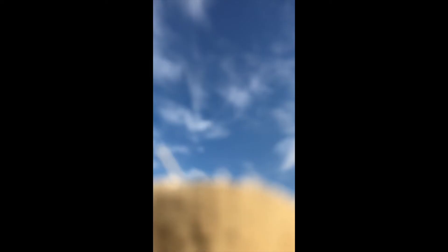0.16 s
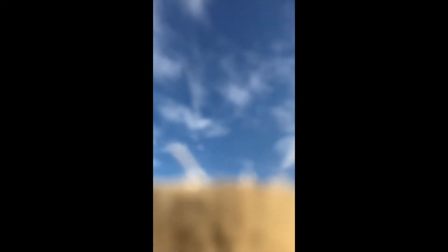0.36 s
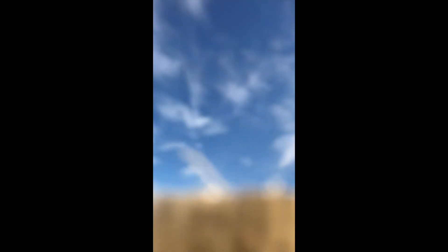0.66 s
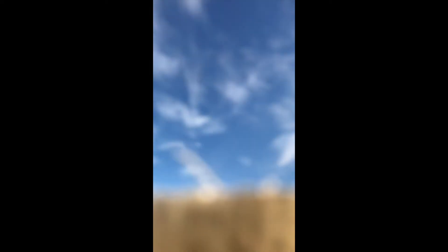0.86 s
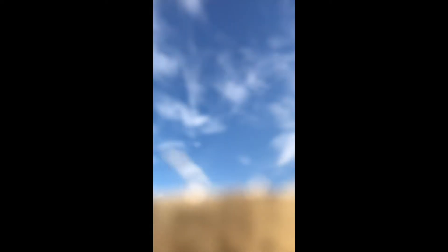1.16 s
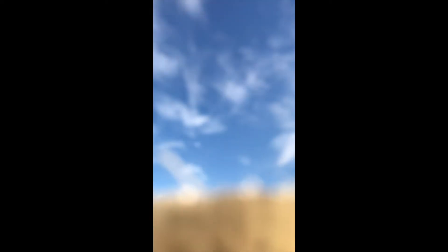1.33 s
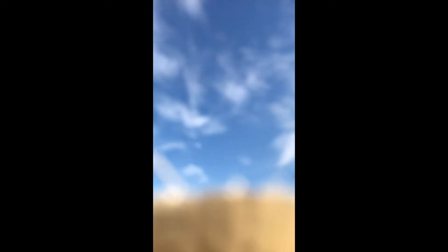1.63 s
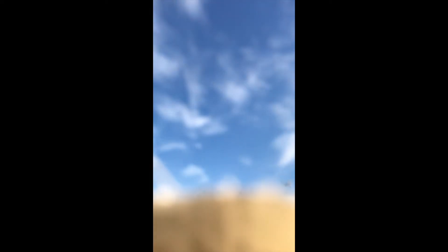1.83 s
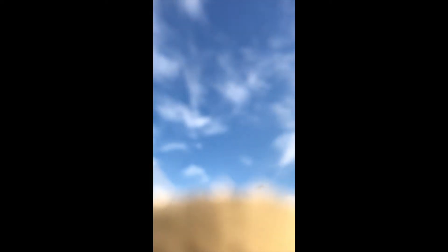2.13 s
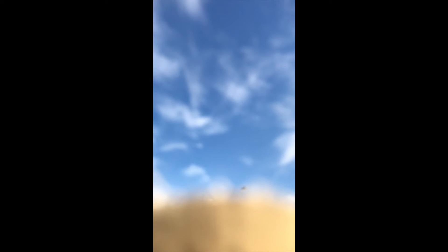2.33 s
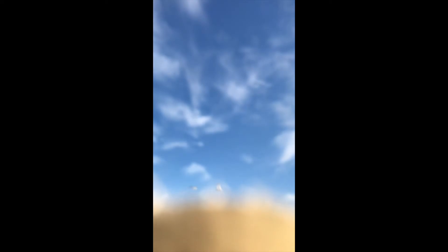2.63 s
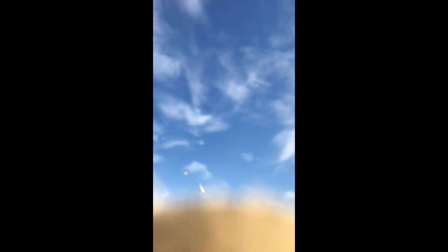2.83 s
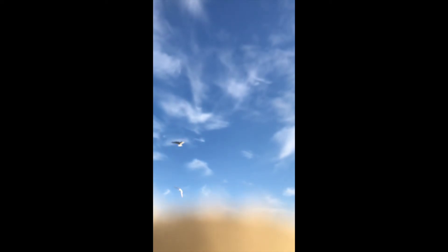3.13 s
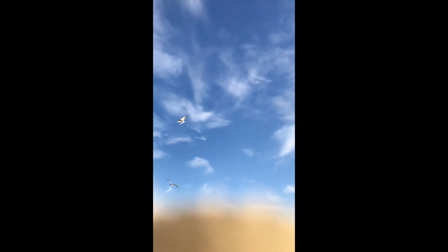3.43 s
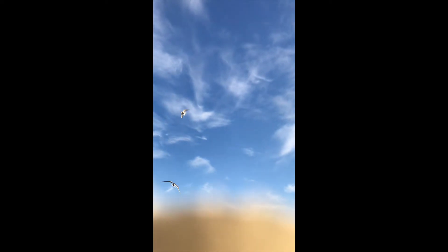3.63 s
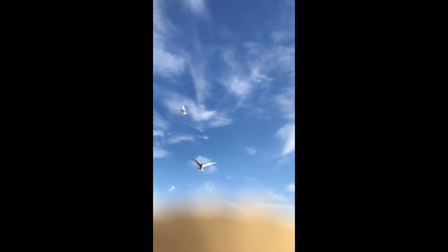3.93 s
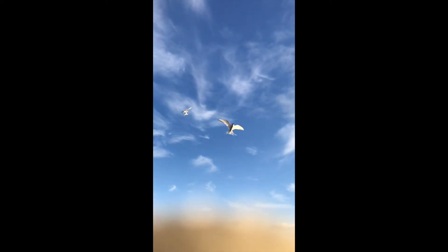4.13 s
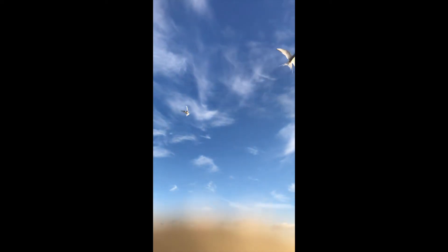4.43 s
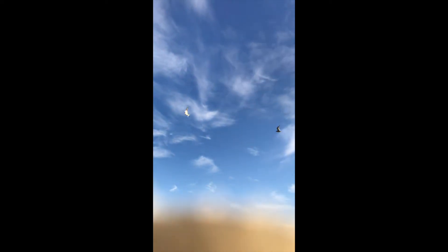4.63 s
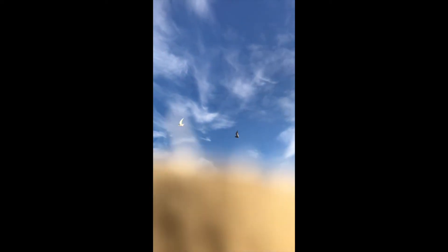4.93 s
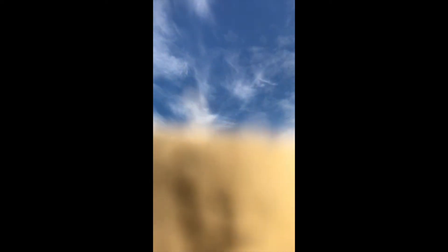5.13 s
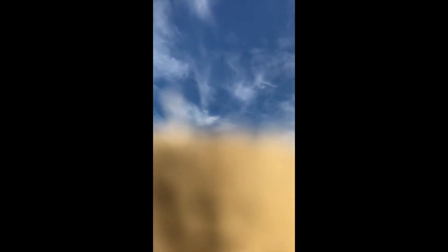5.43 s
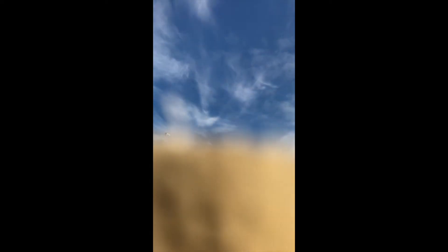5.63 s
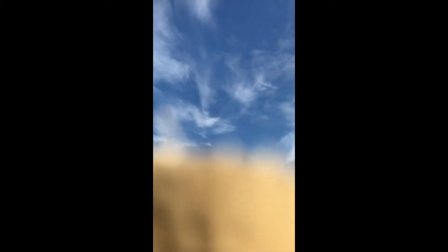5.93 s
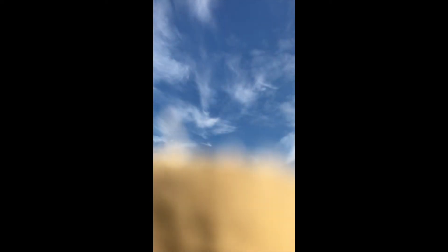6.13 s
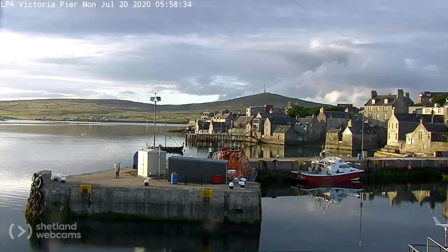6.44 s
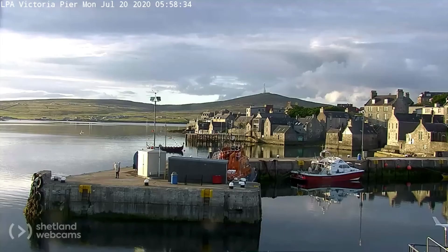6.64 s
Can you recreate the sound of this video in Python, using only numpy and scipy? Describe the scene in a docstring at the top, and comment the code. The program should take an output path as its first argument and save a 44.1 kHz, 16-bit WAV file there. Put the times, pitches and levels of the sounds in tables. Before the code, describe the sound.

Terns call close by in the open air, giving short, sharp, high kip notes that drop into a rasp. One holds a harsh cry while others scream and whistle further off, and a gull calls faintly in the distance. The kips pause briefly, then return louder. The harbour shore gives a slight echo. Underneath, a far engine drones with a low rumble and faint hiss, and light wind now and then bumps the microphone.

```python
"""Terns give sharp 'kip' calls over a harbour shore: a whistle from the two sides of the syrinx snaps on,
falls and breaks into a rasp, slow pulses ringing the throat. One holds a harsh cry; others scream and
whistle further off, and a gull and a low coo sound in the distance. The shore throws back a faint echo
and a thin tail. Underneath, a far engine drones in three low tones, a faint hiss comes and goes,
and light wind now and then bumps the microphone."""
import sys
import numpy as np
from scipy import signal
from scipy.fft import rfft, irfft, next_fast_len
from scipy.io import wavfile
from scipy.ndimage import uniform_filter1d, map_coordinates

SR = 44100
rng = np.random.default_rng(int(sys.argv[2]) if len(sys.argv) > 2 else 0)


def int16_out(signal):
    """Quantize to a 16-bit WAV file."""
    q = np.round(np.clip(np.atleast_2d(signal).T, -1, 1) * 32767)
    wavfile.write(sys.argv[1], SR, q.astype(np.int16))


N = 298998
TIME = np.arange(N) / SR

# The near kips. Each row: start in seconds, top pitch in Hz, whistle length in seconds, level in dB,
# swell of the fundamental over the fall in dB, brightness in dB per overtone, rasp level in dB.
KIPS = [(0.28, 3782, 0.041, -36.5, 5.5, 3.5, -36), (0.653, 3850, 0.047, -31.5, 0, 2, -32),
        (1.541, 3800, 0.046, -31, -5, -2.5, -36.5), (1.905, 3682, 0.052, -32.5, -5, -4.7, -42.5),
        (2.314, 3633, .053, -33, -9.5, -5, -44), (2.652, 3587, 0.049, -39.5, 3.5, -2, -36),
        (2.677, 3570, .044, -33.5, -8, -2, -39.5), (2.982, 3720, 0.036, -37.5, 7, -3, -36.5),
        (2.993, 3663, .043, -32.5, 0, 1.5, -36.5), (4.421, 3833, 0.047, -28, -2, 2.1, -31.5),
        (4.745, 3844, .048, -25, -3.5, -.5, -33), (5.018, 3742, .041, -30.5, -5, 2, -32),
        (5.338, 3666, 0.041, -37, 5.5, 2.7, -36), (5.654, 3820, .043, -39.5, 7, 3, -41.5),
        (5.956, 3697, 0.043, -37.5, 4.5, 0, -40.5), (6.284, 3720, 0.043, -39, 3.5, 1.5, -42)]
# Harmonics 2 to 4 of a kip. Each row: level in dB before brightness is added, change over the fall in dB.
KIP_OVERTONES = [(-12, -6.5), (-19.5, -15), (-17.5, -12.5)]
# The resonances of throat and beak that shape the rasp. Each row: frequency in Hz, gain in dB.
THROAT_EQ = [(400, -17.5), (800, -10), (1200, -8), (1700, -9), (2400, -3), (3100, 4.5), (4500, -4),
             (6200, -17.5), (7600, -24.5), (10500, -24.5), (13500, -29), (15500, -32.5)]
# 'Kee-arr' screams. Each row: start, length, rise time and end of the hold in seconds, pitch in Hz,
# level in dB, level change during the fall in dB per second, starting roughness from 0 to 1.
SCREAMS = [(.459, 0.23, .007, 0.13, 2253, -53, 23.5, 0.05), (1.763, 0.036, .002, .06, 2380, -55, 0, 0.25),
           (2.426, .21, .013, 0.14, 2367, -55.5, -110, 0.1),
           (2.47, 0.23, 0.0018, 0.18, 2483, -61.5, -5, 0.16),
           (3.885, .24, .035, .16, 2400, -60.5, -25, 0.51)]
# A near tern holds a high whistle and breaks into a rattle. The row reads like a scream's.
HARSH_CALL = [(1.893, .287, 0.012, .19, 3330, -47.5, 3.5, 0.13)]
# Faint tern whistles, and the steeply falling end of a scream at 4.085 s. Each row: start and length in
# seconds, pitch in Hz, sag as a share of the pitch per second, level in dB, roughness from 0 to 1.
FAINT_NOTES = [(1.811, 0.11, 3400, 0.4, -62.5, 0.2), (2.80, 0.19, 3520, .8, -66, .35),
               (3.34, 0.34, 3550, 0.65, -81, .25), (3.792, 0.099, 3400, 0.48, -66.5, 0.2),
               (4.085, .12, 3050, 4.2, -61.5, .45), (4.19, .15, 3090, 0.72, -71, .45),
               (5.85, 0.35, 3297, 0.43, -65.5, .45)]
# A far gull's notes. The rows read like the faint notes'.
GULL_NOTES = [(.755, 0.095, 992, 0.66, -54, 0.3), (.82, 0.16, 1133, 1.06, -59, 0),
              (2.12, 0.16, 910, 1.4, -57, .75)]
# A faint low coo. The row reads like a scream's.
COO = [(5.28, 0.367, .025, .19, 331, -66.5, -39, 0.032)]
# The tone of each voice. Each entry: a harmonic's gain in dB, from the fundamental up.
SCREAM_HARMONICS_DB = [-3, -0.5, -16.5, -18, -23.5]
HIGH_VOICE_HARMONICS_DB = [1.5, -5.5, -26.5, -16.5]
GULL_HARMONICS_DB = [-0.5, -13]
COO_HARMONICS_DB = [1, -1, -12]
# The far engine's drone. Each row: frequency in Hz, level in dB.
ENGINE_TONES = [(64.6, -66.5), (91.6, -59.5), (115.3, -55)]
# The spectrum of rumble and open air. Each row: frequency in Hz, relative level in dB.
AIR_EQ = [(22, -28.5), (42, -13), (64, 0.5), (80, -0.5), (105, -3), (140, -6.5), (190, -13.5), (330, -15),
          (560, -24.5), (1100, -27.5), (2000, -42), (4000, -43.5), (9000, -59.5), (16000, -50.5)]
# Swells in the faint hiss. Each row: peak time and half width in seconds, level in dB.
HISS_SWELLS = [(0.581, 0.26, -69.5), (4.2, 0.14, -78.5), (4.8, 0.13, -71.5)]
# Wind bumps. Each row: peak time in seconds, centre in Hz, level in dB, half width in seconds.
WIND_BUMPS = [(.678, 300, -60, .006), (4.875, 62, -50, .03), (4.865, 160, -60, .02), (5.10, 185, -60, .015),
              (5.275, 150, -58, .015)]
# The master fader. Each row: time in seconds, gain from 0 to 1.
FADER = [(.187, 0), (.195, 1), (6.385, 1), (6.405, 0)]


def kip(top_hz, length, db, swell_db, bright_db, rasp_db, hold=.221, twin_gain=.53, twin_lag_s=.00489):
    """A whistle snaps on, holds, falls, and breaks into a rasp near a quarter of its final pitch."""
    t = np.arange(SR // 8) / SR
    progress = t / length
    end_hz = top_hz * (1 - 10 * (length - .026))  # longer kips fall further

    def syrinx_side(lag_s):
        """One side of the syrinx; it starts slightly sharp, and its overtones fade as the pitch falls."""
        fall = ease(((t - lag_s) / length - hold) / (1.08 - hold))
        wobble = .02 * np.exp(-t / .003) + .005 * wander(t, 300) + (.003 + .008 * fall) * wander(t, 1500)
        phase = phase_of((top_hz + (end_hz - top_hz) * fall) * (1 + wobble))
        tone = np.sin(phase)
        for k, (base_db, fade_db) in enumerate(KIP_OVERTONES, 2):
            overtone_db = base_db + (k - 1) * bright_db + (fade_db - swell_db) * fall
            tone += undb(overtone_db + 3.5 * wander(t, 220)) * np.sin(k * phase)
        return np.sqrt(2) * undb(db + swell_db * fall + wander(t, 130)) * tone

    # the second side joins late and trails in pitch, so the two beat on the way down
    twin = twin_gain * ease((progress - .28) / .3)
    whistle = syrinx_side(0) + twin * syrinx_side(twin_lag_s * rng.uniform(.93, 1.1))
    whistle /= np.sqrt(1 + twin ** 2)
    # air hisses at the snap and again as the tone frays
    snap = undb(db - 12) * np.exp(-t / .003)
    fray = undb(rasp_db - 14) * ease((progress - .35) / .65)
    breath = noise(len(t), [(1200, -28), (2800, .5), (7000, -6), (10000, -15), (15000, -11.5)])
    whistle += (snap + fray) * breath
    whistle *= ease(t / .002) * (1 - .2 * np.exp(-t / .008)) * ease((length + .004 - t) / .008)
    # the rasp takes over and the beak shuts on it
    after = np.maximum(t - length, 0)
    rasp_envelope = ease((t - length + .002) / .005) * np.exp(-(after / .021) ** 2.4)
    pulse_hz = end_hz * rng.uniform(.265, .295) * np.exp(-7 * after)
    return whistle + undb(rasp_db) * rasp_envelope * rasp(t, pulse_hz, jitter=rng.uniform(.04, .09))


def rasp(t, hz, jitter, harmonics=18):
    """The syrinx drops to slow uneven pulses that ring the throat; the treble is mostly gated hiss."""
    phase = phase_of(hz * (1 + jitter * wander(t, 1600)))
    # each overtone lags and flickers on its own, as the throat smears every pulse
    pulses = unit(sum(np.cos(k * phase + lag) * undb(2.5 * wander(t, 180))
                      for k, lag in enumerate(rng.uniform(0, np.pi, harmonics), 1)))
    hiss = eq(rng.standard_normal(SR)[:len(t)], [(1000, -14), (3500, 0), (9000, 3)])
    gate = 1 + np.cos(phase)
    source = (pulses + .6 * hiss * gate) * undb(2 * wander(t, 500))
    return unit(eq(source, THROAT_EQ))


def tern_kips(echo_s=.195):
    """The near kips, and their single dull echo off the shore as a separate layer."""
    direct, echo = np.zeros(N), np.zeros(N)
    for start, *shape in KIPS:
        call = kip(*shape)
        add(direct, start, call)
        add(echo, start + echo_s, call)
    return direct, eq(echo, [(1000, -24.5), (3700, -40), (7500, -36.5), (12000, -48.5)])


def tern_cries():
    """The terns' longer voices: screams, one harsh near call and faint sinking notes, with some rasp."""
    screams = arched_calls(SCREAMS, scoop=.12, sag_per_s=.22, fall_per_s=6.8, bend_s=.011,
                           hoarsen=.28, break_s=.028, onset_db=-1)
    harsh = arched_calls(HARSH_CALL, scoop=.25, sag_per_s=.12, fall_per_s=.8, bend_s=.0024,
                         hoarsen=.9, break_s=.029, onset_db=-12)
    faint = sagging_calls(FAINT_NOTES, fade_db=-2)
    return (cries(screams, SCREAM_HARMONICS_DB, flutter_db=1.2, waver=.003, rasp_mix=1.3, near_db=-49)
            + cries(harsh + faint, HIGH_VOICE_HARMONICS_DB,
                    flutter_db=.95, waver=.007, rasp_mix=1.3, near_db=-45.5))


def arched_calls(rows, scoop, sag_per_s, fall_per_s, bend_s, hoarsen, break_s, onset_db):
    """Curves for calls that scoop up to pitch, hold, then bend down, gaining `hoarsen` in roughness."""
    calls = []
    for start, length, rise, held, hz, db, fade_db_per_s, rough in rows:
        t = np.arange(int(length * SR)) / SR
        onset = np.exp(-t / rise)
        falling_s = bend_s * np.logaddexp(0, (t - held) / bend_s)  # the hold rounds off into the fall
        pitch = hz * (1 - scoop * onset) * np.exp(-sag_per_s * t - fall_per_s * falling_s)
        level_db = db + onset_db * onset + fade_db_per_s * falling_s
        calls.append((start, t, pitch, level_db, rough + hoarsen * ease(falling_s / break_s)))
    return calls


def sagging_calls(rows, fade_db):
    """Curves for plain notes that sink and fade evenly."""
    calls = []
    for start, length, hz, sag_per_s, db, rough in rows:
        t = np.arange(int(length * SR)) / SR
        calls.append((start, t, hz * np.exp(-sag_per_s * t), db + fade_db * t / length, rough))
    return calls


def cries(calls, harmonics_db, flutter_db, waver, rasp_mix, near_db):
    """A harmonic voice follows each call's curves; roughness shakes its pitch and blends in any rasp."""
    out = np.zeros(N)
    for start, t, hz, db, rough in calls:
        rough = np.clip(rough, 0, 1)
        wobble = waver * wander(t, 200) + .06 * rough * wander(t, 900)
        phase = phase_of(uniform_filter1d(hz, size=500) * (1 + wobble))
        sag = hz / hz.max()  # overtones weaken as the pitch sags
        flicker_db = flutter_db + 2.7 * rough
        tone = sum(undb(base_db + flicker_db * wander(t, 110)) * sag ** (k - 1) * np.sin(k * phase)
                   for k, base_db in enumerate(harmonics_db, 1))
        rattle = undb(3.5 * rough ** 2 * wander(t, 170)) * rasp(t, hz / 3, jitter=.02 + .05 * rough ** 2)
        voice = np.sqrt(2 - 2 * rough ** 2) * tone + rasp_mix * rough * rattle
        # calls fainter than near_db come from further off, and the air takes their treble
        loss_db = max(near_db - db.max(), 0)
        voice = eq(voice, [(4000, 0), (7000, -.35 * loss_db), (13000, -loss_db)])
        fades = ease(t / .005) * ease((t[-1] - t) / .025)
        add(out, start, voice * fades * undb(db + 2 * flutter_db * wander(t, 130)))
    return out


def far_birds():
    """A gull's sinking notes and one low, wavering coo, both without rasp."""
    gull = sagging_calls(GULL_NOTES, fade_db=-7)
    coo = arched_calls(COO, scoop=.137, sag_per_s=.145, fall_per_s=2.9, bend_s=.014,
                       hoarsen=0, break_s=.04, onset_db=4)
    return (cries(gull, GULL_HARMONICS_DB, flutter_db=1, waver=.0095, rasp_mix=0, near_db=-50)
            + cries(coo, COO_HARMONICS_DB, flutter_db=2, waver=.032, rasp_mix=0, near_db=-50))


def shore_reverb(send, ground_t60_s=.15, ground_db=-21, tail_t60_s=1.6, tail_db=-24):
    """Rough ground scatters the calls at once; walls and slopes return a thin, patchy, dull tail."""
    t = np.arange(3 * SR // 2) / SR
    ground = unit(rng.standard_normal(len(t)) * undb(-60 * t / ground_t60_s) * ease(t / .027))
    reflections = rng.standard_normal(len(t)) * (rng.random(len(t)) < 300 / SR)  # about 300 a second
    scatter = unit(reflections) + .5 * rng.standard_normal(len(t))
    tail = unit(scatter * undb(-60 * t / tail_t60_s) * ease(t / .029))
    response = (undb(ground_db) * ground + undb(tail_db) * tail) / np.sqrt(len(t))
    wet = signal.fftconvolve(send, response)[:N]
    return eq(wet, [(500, 4.5), (2100, 6), (2900, 6.5), (3300, -3.5), (3800, -8.5), (4600, 4),
                    (6500, -1), (7700, -16), (11000, -15), (15000, -33)])


def far_engine():
    """A distant engine drones on low tones, each drifting a little in level and phase."""
    drone = np.zeros(N)
    for hz, db in ENGINE_TONES:
        gain = np.sqrt(2) * undb(db + 1.3 * wander(TIME, 4.73))
        drone += gain * np.sin(2 * np.pi * hz * TIME + .83 * wander(TIME, 1.9))
    return drone


def light_wind(level_db=-58):
    """A bed of low rumble and open air that stirs gently with the breeze."""
    breeze_db = .4 * wander(TIME, 2) + .7 * wander(TIME, 14)
    return noise(N, AIR_EQ) * undb(level_db + breeze_db)


def faint_hiss(floor_db=-75):
    """A soft, steady hiss with a few brief swells."""
    hiss = noise(N, [(1500, 9.5), (4000, 1.5), (7000, -4), (16000, -6)])
    swells = sum(undb(db) * np.exp(-.5 * ((TIME - peak) / width) ** 2) for peak, width, db in HISS_SWELLS)
    return hiss * (undb(floor_db) + swells)


def wind_bumps():
    """Wind hits the microphone in short, low puffs."""
    out = np.zeros(N)
    t = np.arange(-SR // 8, SR // 8) / SR
    for peak, hz, db, width in WIND_BUMPS:
        puff = noise(len(t), [(hz / 3, -30), (hz, 0), (hz * 3, -35), (hz * 10, -70)])
        add(out, peak + t[0], undb(db) * puff * np.exp(-.5 * (t / width) ** 2))
    return out


def undb(db):
    """Decibels to gain."""
    return 10 ** (np.asarray(db) / 20)


def unit(x):
    """Scale to rms 1."""
    return x / np.sqrt(np.mean(x ** 2) + 1e-20)


def eq(x, points):
    """Filter with an EQ curve drawn through (Hz, dB) points."""
    hz, db = np.transpose(points)
    size = next_fast_len(len(x) + 512)
    bin_hz = np.maximum(np.arange(size // 2 + 1) * SR / size, 1)
    gain = undb(np.interp(np.log(bin_hz), np.log(hz), db))
    return irfft(rfft(x, size) * gain, size)[:len(x)]


def noise(samples, points):
    """Noise at rms 1, coloured by an EQ curve."""
    return unit(eq(rng.standard_normal(samples), points))


def wander(t, rate):
    """A smooth random modulator, spread near 1, that changes `rate` times a second."""
    return map_coordinates(rng.standard_normal(2048), [(t - t[0]) * rate], order=2, mode="wrap")


def ease(u):
    """Smooth step from 0 to 1."""
    return .5 - .5 * np.cos(np.pi * np.clip(u, 0, 1))


def phase_of(hz):
    """Phase of a moving pitch."""
    return 2 * np.pi * np.cumsum(hz) / SR


def add(out, start, x):
    """Mix a sound in at `start` seconds."""
    i = int(start * SR)
    out[i:i + len(x)] += x[:len(out) - i]


def scene():
    """The mono mix: terns in front, gull and coo deeper in the reverb, the harbour bed underneath."""
    kips, echo = tern_kips()
    terns = kips + tern_cries()
    distant = far_birds()
    reverb = shore_reverb(terns + 1.9 * distant)
    bed = far_engine() + light_wind() + faint_hiss() + wind_bumps()
    return (terns + echo + distant + reverb + bed)[None]


def record(dry):
    """Fade quickly in and out, then cut the top steeply at 16 kHz."""
    faded = dry * np.interp(TIME, *np.transpose(FADER))
    return signal.sosfilt(signal.ellip(8, .2, 70, 16000, fs=SR, output="sos"), faded)


dry = scene()
out = record(dry)
int16_out(out)
```